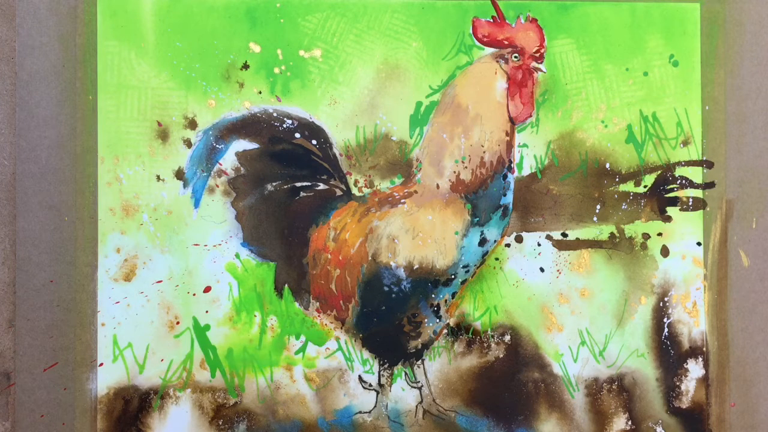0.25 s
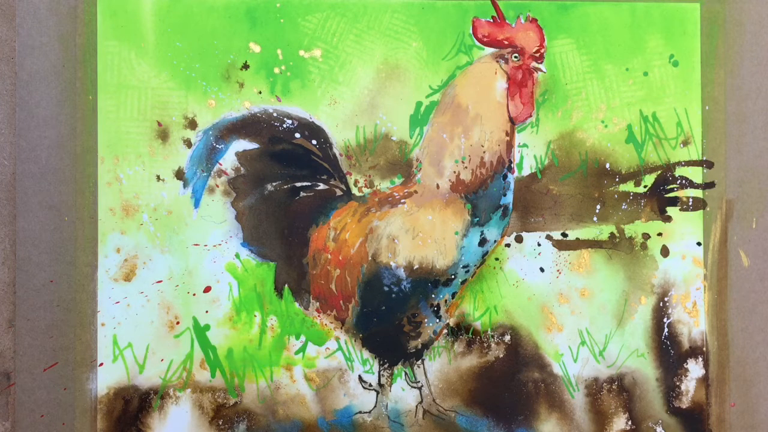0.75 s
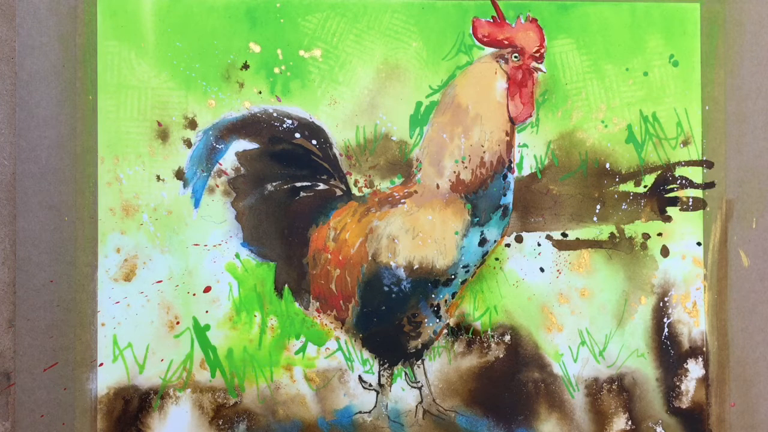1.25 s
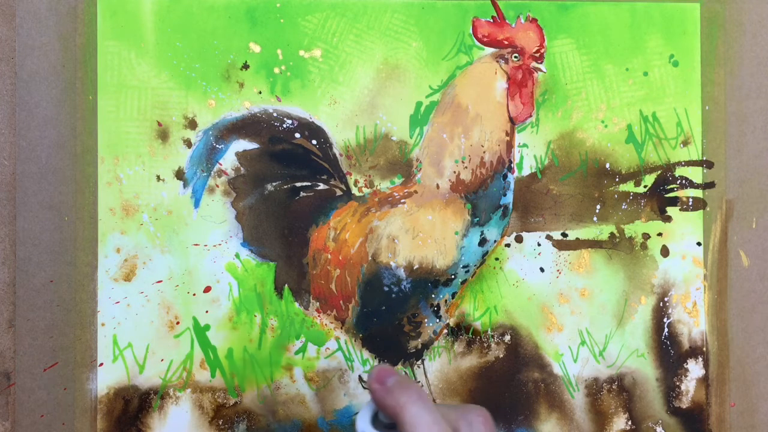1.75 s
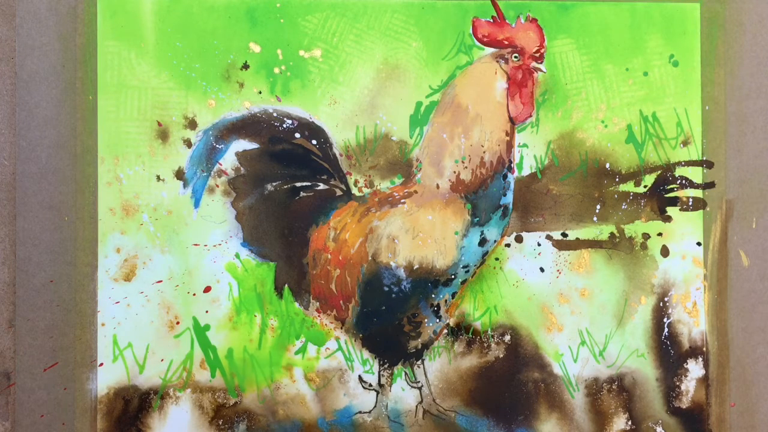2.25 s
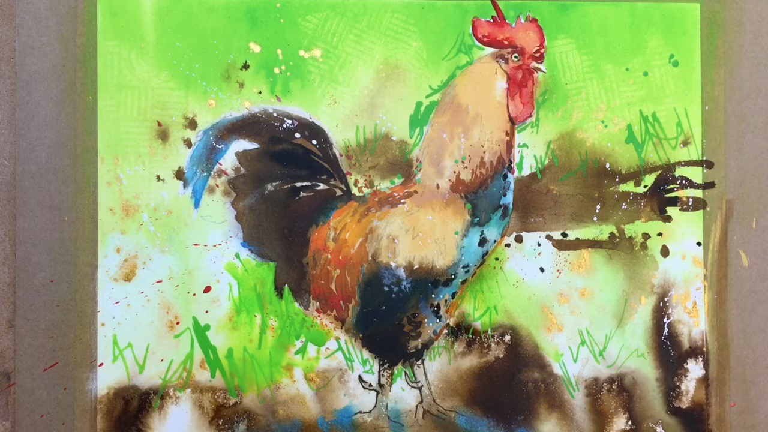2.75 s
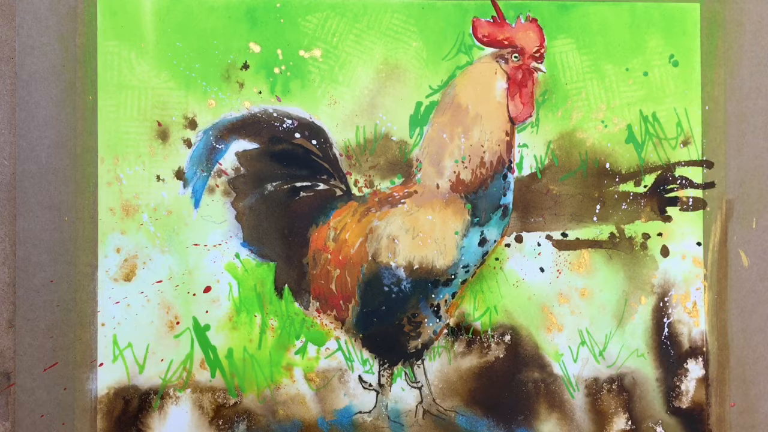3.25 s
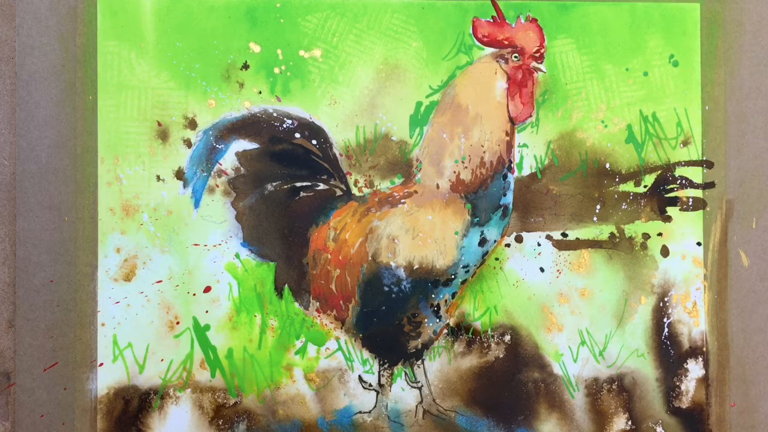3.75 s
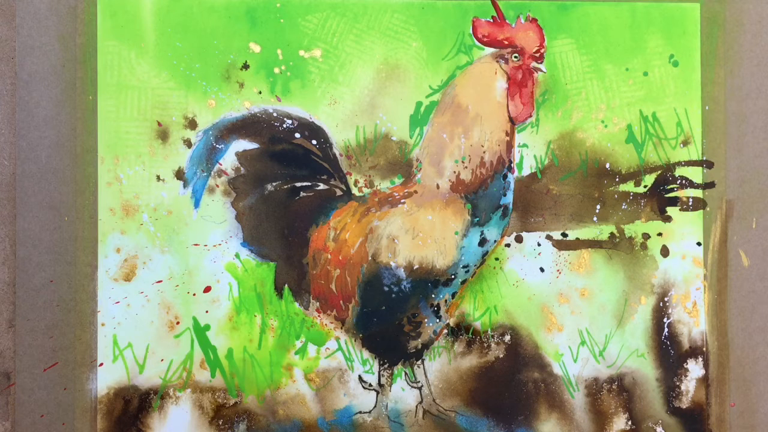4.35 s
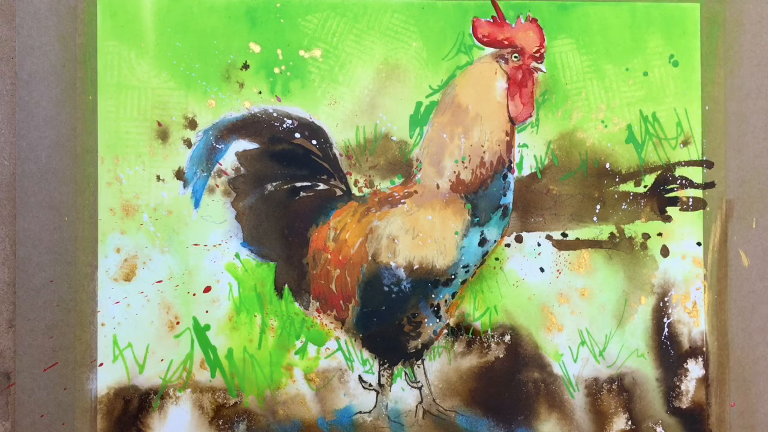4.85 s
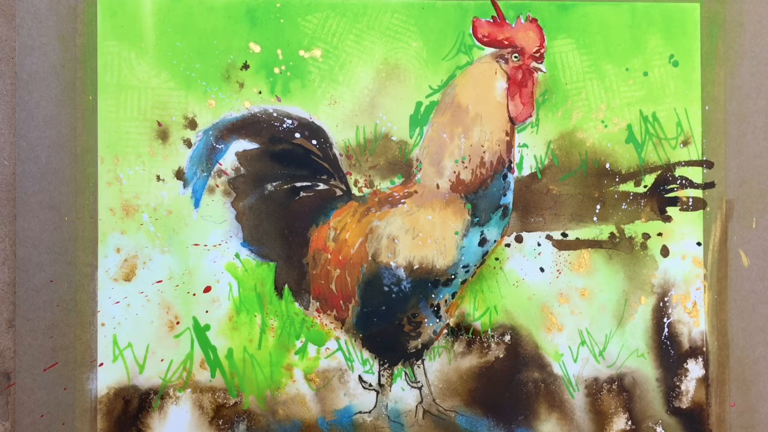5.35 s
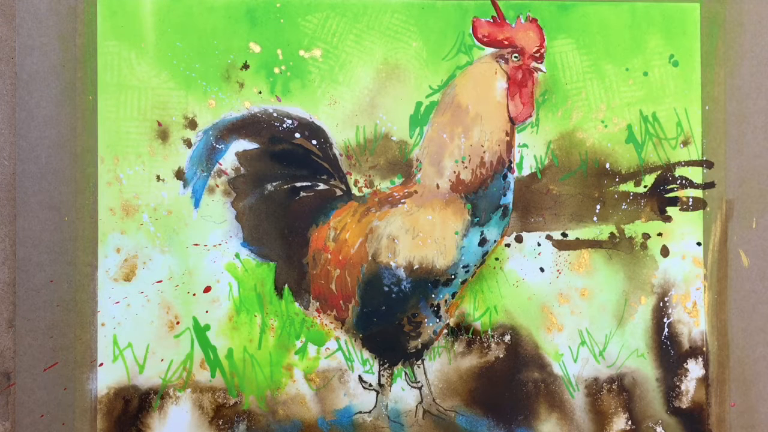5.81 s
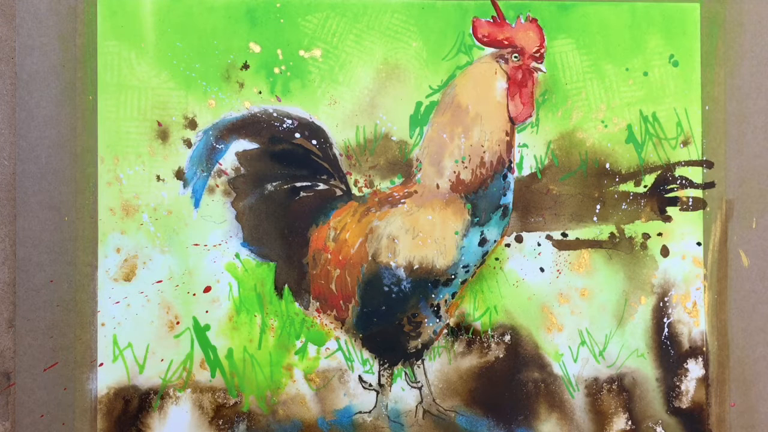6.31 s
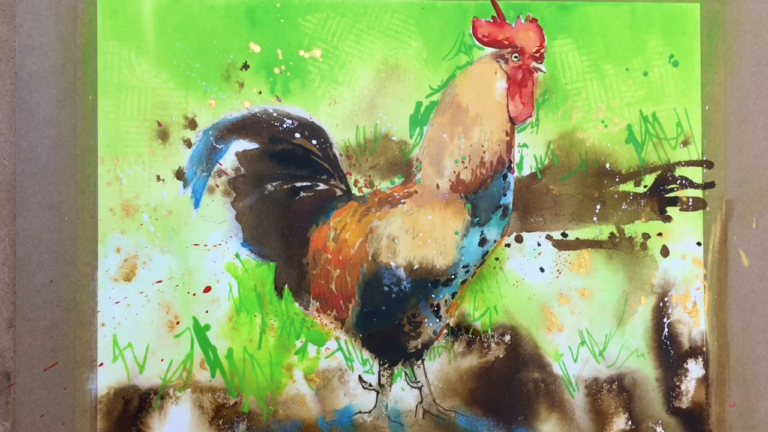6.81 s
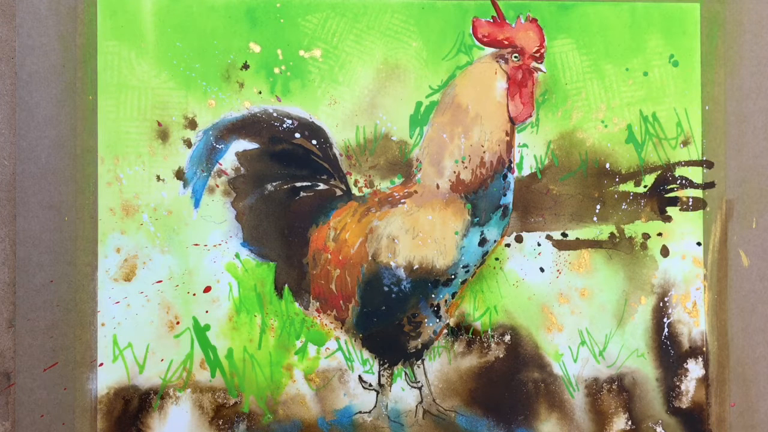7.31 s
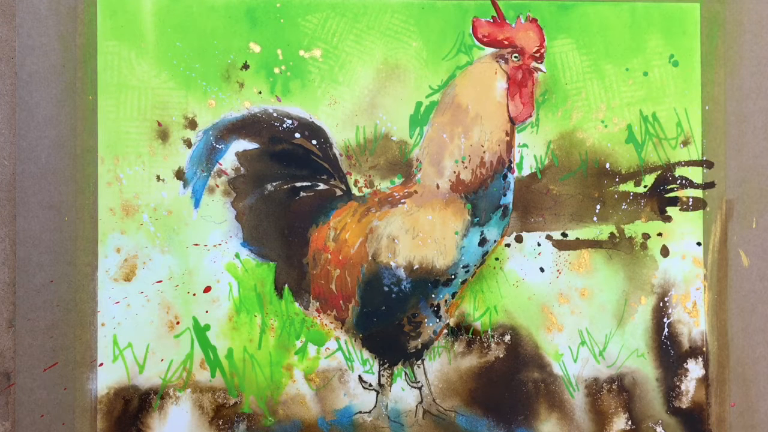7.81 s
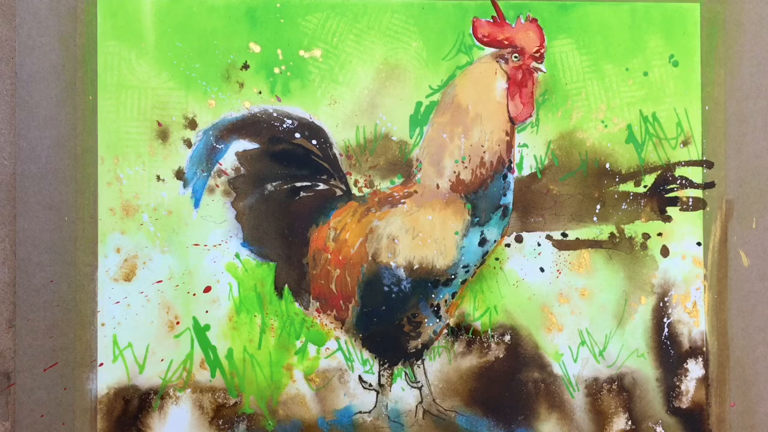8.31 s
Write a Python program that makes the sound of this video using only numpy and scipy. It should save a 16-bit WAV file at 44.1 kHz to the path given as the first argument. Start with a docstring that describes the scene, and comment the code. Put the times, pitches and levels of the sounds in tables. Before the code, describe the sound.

A pump bottle gives three short misty squirts and a slower airy one, then after quiet it clatters down and the table is bumped.

```python
"""A pump bottle mists a wet painting with three short squirts, then a slow, airy one, in a quiet room.
Jets are coloured noise broken into droplets; soft brushing is brief swells of broad noise.
After one last weak puff the plastic bottle is put down among the painting things with a clatter:
short buzzes of contact set its modes ringing. Then the table is bumped and a paint tray judders as it
is pushed along, both as struck modes with dying noise. A low rumble and a faint hiss lie underneath."""
import sys
import numpy as np
from scipy import signal
from scipy.fft import rfft, irfft, next_fast_len
from scipy.io import wavfile

SR = 44100
rng = np.random.default_rng(int(sys.argv[2]) if len(sys.argv) > 2 else 0)


def generate_wav(signal):
    """Clip the signal to [-1, 1] and save it as 16-bit WAV at the path in sys.argv[1]."""
    frames = np.transpose(np.atleast_2d(signal))
    scaled = np.clip(frames, -1, 1) * 32767
    pcm = np.round(scaled).astype(np.int16)
    wavfile.write(sys.argv[1], SR, pcm)


N = 377937
TIME = np.arange(N) / SR  # [s]


def from_db(db):
    """Level to gain: 20 dB is a factor of ten in amplitude."""
    return 10 ** (np.asarray(db) / 20)


def rms_one(x):
    """Normalise the mean power: scale to rms 1."""
    return x / np.sqrt(np.mean(x ** 2) + 1e-20)


def at_hz(points, hz):
    """Pitch is heard in ratios: read a table along a log-frequency axis."""
    f, value = np.transpose(points)
    return np.interp(np.log(np.maximum(hz, 1)), np.log(f), value)


def coloured(spectrum, size):
    """Spectral shaping: white noise weighted by a colour; its level follows the colour's densities."""
    hz = np.arange(size // 2 + 1) * SR / size
    white = rfft(rng.standard_normal(size))
    return irfft(white * from_db(at_hz(spectrum, hz)), size)


def noise(spectrum):
    """Stationary turbulence: steady noise of a given colour, rms 1."""
    return rms_one(coloured(spectrum, next_fast_len(N))[:N])


def flutter(per_s):
    """Random modulation: lines between random knots, per_s of them a second, with a spread of 1."""
    knots = rng.standard_normal(N)
    return rms_one(np.interp(TIME * per_s, np.arange(N), knots))


def high_pass(x, hz):
    """Fourth-order filtering: the bass falls by 24 dB per octave below the corner."""
    return signal.sosfilt(signal.butter(4, hz, "high", fs=SR, output="sos"), x)


def add(out, s, sound):
    """Superposition: mix a sound in from time s."""
    at = int(round(s * SR))
    out[at:at + len(sound)] += sound[:N - at]


def ring(modes, uneven_db):
    """Modal decay: a blow excites every mode with a strength of its own, and each dies exponentially."""
    t = TIME[:SR // 2]
    chance = rng.standard_normal(len(modes))
    out = np.zeros(len(t))
    for k, (hz, db, t60) in enumerate(modes):
        gain = (-1) ** k * from_db(db + uneven_db * chance[k])
        out += gain * np.exp(-np.log(1000) * t / t60) * np.sin(2 * np.pi * hz * t)
    return out


def dying_noise(spectrum, t60s):
    """High modal density: countless modes merge into noise that starts at rms 1 and dies band by band."""
    size = SR // 2
    hz = np.arange(size // 2 + 1) * SR / size
    start = rfft(rms_one(coloured(spectrum, size)))
    edges = [0, 300, 600, 1200, 2400, 4800, 9600, SR / 2]  # [Hz]
    out = np.zeros(size)
    for low, high in zip(edges, edges[1:]):
        t60 = at_hz(t60s, (low + high) / 2)
        band = irfft(start * (hz >= low) * (hz < high), size)
        out += band * np.exp(-np.log(1000) * TIME[:size] / t60)
    return out


def stroke(start, attack, length, fall_db_per_s):
    """Pressure envelope of one push: it rises, holds to the end of its length and dies exponentially."""
    t = TIME - start
    fall_db = np.minimum(fall_db_per_s * np.maximum(t - length, 0), 100)
    return np.clip(t / attack, 0, 1) ** 2 * from_db(-fall_db)


def spray(grain_db, sputter_s, spurt_db):
    """Jet break-up: rushing air tears into hissing droplets that land; air in the nozzle makes it spit."""
    # strokes of the pump: (start [s], attack [s], length [s], rush of air [dB], hiss of mist [dB],
    # mist landing on the paper [dB], lingering wisp [dB])
    squirts = [(.037, 0.018, 0.11, -48, -48.5, -74, -72), (1.017, .014, 0.082, -50, -48.5, -78, -56),
               (1.858, .012, 0.11, -52.5, -40.5, -56.5, -56.5), (7.211, 0.074, .1, -63.5, -50, -88, -80)]
    # sputters of the nozzle: (time [s], level [dB])
    sputters = [(0.046, -52), (1.069, -43), (1.076, -43), (1.874, -41), (1.9072, -34.5)]
    # colours of the air, the mist, its landing on the paper and the narrow, wet hiss that outlasts
    # each squirt: (frequency [Hz], density [dB per Hz])
    air_colour = [(400, -69), (750, -24), (1000, -10), (1170, 1), (1350, -17), (1720, -2), (2100, -2),
                  (2750, 2.5), (3500, 2), (4100, -8.5), (6000, -6), (12000, -24)]
    mist_colour = [(1500, -22), (4000, -6), (5000, -2), (5900, 1), (7200, .5), (7800, -3.5), (8400, -1),
                   (9500, -1), (10300, -7), (11300, -2.5), (12300, -2.5), (12900, 1.5), (14100, 2.5),
                   (15600, -1)]
    paper_colour = [(400, -25), (620, -14), (780, -5.5), (950, -6), (1180, 3.5), (1400, -8.5), (2000, -26),
                    (4000, -33)]
    wisp_colour = [(1500, -31), (2150, -4), (2700, 2), (3400, -9), (4500, -24)]
    swell_range_db = 2  # pressure swells towards mid-stroke
    # after the stroke each part dies at its own rate [dB/s]
    air_fall, mist_fall, landing_fall, wisp_fall = 409, 514, 900, 202
    flight_s = 0.03  # the mist starts to reach the paper this much later
    drop_db = -10.5  # patter of the bigger drops, relative to the rush of air

    air, mist, landing, wisp = np.zeros((4, N))
    for s, attack, length, air_db, mist_db, paper_db, wisp_db in squirts:
        progress = np.clip((TIME - s) / length, 0, 1)
        swell_db = swell_range_db * (np.sin(np.pi * progress) - .5)
        air += from_db(air_db + swell_db) * stroke(s, attack, length, air_fall)
        mist += from_db(mist_db + swell_db) * stroke(s, attack, length, mist_fall)
        arrival = stroke(s + flight_s, attack, length - flight_s, landing_fall)
        landing += from_db(paper_db + swell_db) * arrival
        # the wisp builds up over the whole stroke
        wisp += from_db(wisp_db) * stroke(s, length, length, wisp_fall)
    for s, db in sputters:
        mist += from_db(db) * np.exp(-np.minimum(((TIME - s) / sputter_s) ** 2, 20))
    # fine grain and slower spurts
    droplets = from_db(grain_db * (flutter(2500) - 1.24) + spurt_db * flutter(260))
    jet = air * noise(air_colour) + mist * noise(mist_colour)
    jet += landing * noise(paper_colour) + wisp * noise(wisp_colour)
    return droplets * jet + from_db(drop_db) * air * patter()


def patter(count=16):
    """Random impacts: drops of random size each excite a short tick at one of a set of pitches; rms 1."""
    drops_per_s, spread_db = 800, 3
    low_hz, high_hz, t60_cycles = 1670, 7000, 22

    sizes = from_db(spread_db * np.minimum(rng.exponential(1, N), np.pi)) * rng.choice([-1, 1], N)
    drops = sizes * (rng.random(N) < drops_per_s / SR)
    dealt = rng.integers(0, count, N)
    out = np.zeros(N)
    for k, hz in enumerate(np.geomspace(low_hz, high_hz, count)):
        # two-pole resonator: radius sets the decay, angle the pitch
        radius = np.exp(-np.log(1000) * hz / (t60_cycles * SR))
        angle = 2 * np.pi * hz / SR
        poles = [1, -2 * radius * np.cos(angle), radius * radius]
        out += signal.lfilter([0, np.sin(angle)], poles, drops * (dealt == k) + 1e-18)
    return rms_one(out)


def slow_press(gain_db, grain_db, split_hz, flutter_db):
    """Turbulent flow: a longer, duller rush, brighter as it strengthens, led in by a hollow, wavering hiss."""
    # flow, mostly air and little mist: (time [s], level before gain_db [dB])
    flow = [(3.12, -73), (3.186, -63.5), (3.192, -54), (3.268, -57.5), (3.322, -43), (3.38, -43),
            (3.41, -49.5), (3.436, -47), (3.52, -81)]
    # colours of the airy jet and of the hollow hiss: (frequency [Hz], density [dB per Hz])
    swish_colour = [(300, -21), (600, -19), (880, -13), (1100, -14), (1700, -5), (2100, 1), (3100, -0.5),
                    (3900, -2), (5000, -9.5), (5800, -9.5), (7300, -15.5), (9300, -19), (10400, -23),
                    (15500, -28)]
    leak_colour = [(400, -13), (700, -4.5), (850, 3.5), (1080, -11), (1450, -9), (1580, -23), (1730, 7.5),
                   (1950, -30), (2800, -20), (3150, -2), (3500, -23), (3850, -19), (4500, -34), (7000, -35)]
    full_flow_db, bright_db_per_db = -46, 0.16  # the stronger the flow, the brighter the rush
    leak_db = -55.5

    level_db = np.interp(TIME, *np.transpose(flow), left=-140, right=-140)
    rush = noise(swish_colour) * from_db(grain_db * flutter(600))
    low = signal.sosfilt(signal.butter(2, split_hz, fs=SR, output="sos"), rush)
    high = signal.sosfilt(signal.butter(2, split_hz, "high", fs=SR, output="sos"), rush)
    tilt = from_db(np.clip(bright_db_per_db * (level_db - full_flow_db), -10, 10))
    # the bands are opposite in phase at the split, so subtracting joins them
    press = from_db(level_db + gain_db) * (low / tilt - high * tilt)
    leak = stroke(3.178, attack=0.01, length=0.07, fall_db_per_s=200) * noise(leak_colour)
    return press + from_db(leak_db + flutter_db * flutter(150)) * leak


def taps(skirt_db, low_hz, bottle_low_hz, rise_share, sizzle_db, sizzle_s):
    """Impact excitation: each contact buzzes around its own pitch; the hollow bottle rings and sizzles."""
    # small things knocking: (time [s], click level [dB], click pitch [Hz], click width [octaves],
    # bottle ring level [dB])
    contacts = [(7.378, -53, 934, 0.11, -82), (7.4238, -36.5, 11800, 0.31, -52),
                (7.435, -34.5, 6200, 0.1, -51), (7.4492, -33.5, 3920, 0.37, -54),
                (7.451, -29, 2124, 0.087, -33), (7.502, -46, 4160, 0.13, -58), (7.504, -53, 1620, .27, -75),
                (7.52, -58, 2200, .24, -61), (7.631, -53, 14000, .2, -72), (7.632, -48, 2180, .17, -66),
                (7.651, -42.5, 5350, 0.16, -48), (7.678, -47.5, 2240, .22, -58),
                (7.753, -43.5, 2430, 0.1, -72), (7.799, -56.5, 2830, 0.45, -75),
                (7.831, -53, 5140, 0.27, -80), (7.925, -44.5, 2610, 0.12, -57),
                (8.066, -56, 1310, 0.31, -85), (8.073, -57.5, 630, 0.062, -83),
                (8.082, -57, 1200, 0.28, -81), (8.289, -41, 1900, 0.092, -57),
                (8.289, -38.5, 920, .14, -56), (8.399, -55.5, 7900, 0.16, -80)]
    # modes of the bottle: (frequency [Hz], level [dB], t60 [s])
    bottle_modes = [(1184, 0, .065), (2099, -11, .11), (2190, -7, .05), (2385, -16, .08), (3047, -13, .045),
                    (3700, -15, .02), (4100, -14, .03), (5905, -15, .022), (6465, -15, .022)]
    # brief bright sizzle of a blow on the bottle: (frequency [Hz], density [dB per Hz])
    sizzle_colour = [(1000, -11), (3000, -6), (6000, 4), (9000, -12), (14000, -4)]
    click_cycles = 10.8  # fade in cycles of the click's own pitch: high ones are shorter
    hard_db, shorter_db_per_db = -41, 0.1  # blows harder than this let go sooner

    clicks, bottle, sizzle = np.zeros((3, N))
    size = SR // 2
    t = TIME[:size]
    freq = np.maximum(np.arange(size // 2 + 1) * SR / size, 1)
    for s, db, hz, width, bottle_db in contacts:
        octaves = np.log2(freq / hz)
        fade_s = click_cycles / hz * from_db(-shorter_db_per_db * max(db - hard_db, 0))
        # a narrow peak on a broad skirt
        colour = 1 / (1 + (octaves / width) ** 4)
        colour += from_db(skirt_db) / (1 + (octaves / 2) ** 2) ** np.pi
        fade = np.exp(-t / fade_s)
        # longer contacts also start more softly
        rise = 1 - np.exp(-t / (rise_share * fade_s))
        click = irfft(rfft(rng.standard_normal(size)) * colour, size) * rise * fade
        # the level sets the energy of the click
        click *= np.sqrt(np.sum(fade ** 2) / np.sum(click ** 2))
        add(clicks, s, from_db(db) * click)
        add(bottle, s, from_db(bottle_db) * ring(bottle_modes, 1))
        add(sizzle, s, from_db(bottle_db + sizzle_db) * np.exp(-t / sizzle_s))
    # small things radiate no bass
    return high_pass(clicks, low_hz) + high_pass(bottle, bottle_low_hz) + sizzle * noise(sizzle_colour)


def knocks(blows, modes, clatter_db, crack_db, crack_s):
    """Modal impact: heavy blows give a short crack, the low modes of the body and a dying clatter."""
    # colour of the dense, short-lived clatter: (frequency [Hz], density [dB per Hz])
    clatter_colour = [(60, -5), (110, 2), (200, 3), (500, -3), (1100, 0.5), (2000, -7), (3000, -12),
                      (5500, -19), (7000, -25.5), (10000, -45), (16000, -39)]
    # its decay: (frequency [Hz], t60 [s])
    clatter_t60 = [(200, 0.59), (1000, 0.28), (2500, 0.17), (6000, 0.12), (16000, 0.2)]

    out = np.zeros(N)
    for s, db in blows:
        crack = dying_noise(clatter_colour, clatter_t60) * np.exp(-TIME[:SR // 2] / crack_s)
        clatter = dying_noise(clatter_colour, clatter_t60)
        blow = ring(modes, 0.54) + from_db(clatter_db) * clatter + from_db(crack_db) * crack
        add(out, s, from_db(db) * blow)
    return out


def table_bumps():
    """Impulsive excitation of a plate: blows on the table ring its low modes."""
    # blows on the table: (time [s], level [dB])
    bumps = [(8.2915, -51.5), (8.3285, -27.5), (8.3805, -38), (8.411, -46.5)]
    # modes of the table: (frequency [Hz], level [dB], t60 [s])
    table_modes = [(75.5, -17.5, 0.37), (187, 2.5, 0.1), (218, -0.5, 0.32), (246, -3.5, 0.23),
                   (290.4, -3.5, 0.22), (364.6, 1, 0.18), (488, 1, 0.046), (557, -2, 0.1), (635, -15, 0.18),
                   (777, -7.5, 0.19), (844, -19, 0.22), (1194, -18, 0.21), (1700, -19.5, 0.28)]
    return knocks(bumps, table_modes, clatter_db=-5.5, crack_db=-9.5, crack_s=0.0088)


def tray_slips():
    """Stick-slip: the pushed tray lets go in jerks, each striking its modes."""
    # slips of the tray: (time [s], level [dB])
    slips = [(8.498, -27), (8.5195, -32.5), (8.5335, -31.5), (8.563, -34.5)]
    # modes of the tray: (frequency [Hz], level [dB], t60 [s])
    tray_modes = [(92.7, -5, 0.08), (206, 1.5, 0.17), (278.5, -5, 0.21), (493, -8.5, 0.071),
                  (567, -16, 0.33), (996, -6.5, 0.12), (1105, -10.5, 0.071), (1310, -12, 0.062),
                  (1670, -24, 0.055), (2080, -5.5, 0.034)]
    return knocks(slips, tray_modes, clatter_db=-6, crack_db=-9.0, crack_s=0.0095)


def rustles():
    """Friction noise: soft brushing of hands and things, quick to swell and slower to fade."""
    # brushings: (time [s], level [dB], fade [s], centre [Hz])
    brushings = [(2.66, -68.5, 0.06, 1950), (2.78, -69.5, 0.027, 900), (2.846, -69.5, 0.018, 1290),
                 (5.95, -73, 0.034, 2200), (6.209, -63.5, 0.025, 1290), (7.387, -62, 0.031, 2000),
                 (7.652, -53.5, 0.019, 2600), (7.929, -54.5, .019, 3170)]
    rise_share = 0.43  # rise as a share of the fade

    out = np.zeros(N)
    for s, db, fade_s, hz in brushings:
        colour = [(hz / 8, -22), (hz / 2, -3), (hz, 0), (hz * 3, -10), (hz * 8, -20)]
        width = fade_s * np.where(TIME < s, rise_share, 1)
        swell = np.exp(-.5 * np.minimum(((TIME - s) / width) ** 2, 100))
        out += from_db(db) * swell * noise(colour)
    return out * from_db(2 * flutter(200))


def room(x, wet_db, delay_s):
    """Reverberation: diffuse reflections of a small room die at a rate set by frequency."""
    colour = [(100, 3.0), (2500, 1), (8000, 0.0), (16000, -4.0)]  # (frequency [Hz], density [dB per Hz])
    t60s = [(300, 0.11), (2500, 0.2), (8000, 0.17), (16000, 0.2)]  # (frequency [Hz], t60 [s])
    tail = dying_noise(colour, t60s)
    echoes = np.zeros(N)
    add(echoes, delay_s, tail / np.sqrt(np.sum(tail ** 2)))
    return x + from_db(wet_db) * signal.fftconvolve(x, echoes[:SR])[:N]


def low_rumble():
    """Band-limited noise: the room's low rumble wavers and rises and falls in level."""
    # level of the rumble, before its wavering: (time [s], level [dB])
    rumble_levels = [(0.0, -64), (0.57, -69), (1.12, -62), (1.8, -69.5), (1.92, -54), (1.94, -66),
                     (2.65, -68.5), (2.69, -57.5), (2.9, -64.5), (3.31, -57.5), (4.32, -63), (4.45, -70.5),
                     (4.8, -63.5), (4.84, -53.5), (5.14, -69), (5.23, -55.5), (5.6, -63.5), (8.2, -68)]
    # colour of the rumble: (frequency [Hz], density [dB per Hz])
    rumble_colour = [(20, -33), (32, -24), (45, -9.5), (68, 4.5), (90, 0), (125, -12), (200, -33.5),
                     (400, -67)]
    waver_db = 1.6
    level_db = np.interp(TIME, *np.transpose(rumble_levels)) + waver_db * flutter(12)
    return from_db(level_db) * noise(rumble_colour)


def room_hiss():
    """Stationary noise: the faint steady hiss of the room."""
    # colour of the hiss: (frequency [Hz], density [dB per Hz])
    hiss_colour = [(76, -48), (130, -0.5), (172, -3), (252, -4), (350, -9.5), (570, -12.5), (800, -14.5),
                   (2200, -15), (4900, -21.5), (6200, -22), (9500, -25.5), (10400, -29), (11500, -26),
                   (15500, -30)]
    return from_db(-69.5) * noise(hiss_colour)


def scene():
    """Superposition: spray and handling over the room's rumble and a faint hiss."""
    jets = spray(grain_db=2.0, sputter_s=0.0022, spurt_db=2.0)
    jets += slow_press(gain_db=-2, grain_db=1.5, split_hz=1160, flutter_db=1.5)
    airy = room(jets + rustles(), wet_db=-12, delay_s=.005)
    contacts = taps(skirt_db=-22.5, low_hz=510, bottle_low_hz=1030,
                    rise_share=0.07, sizzle_db=-7.5, sizzle_s=0.011)
    clatter = room(contacts, wet_db=-8.5, delay_s=.004)
    heavy = high_pass(table_bumps() + tray_slips(), hz=58)
    return (airy + clatter + heavy + room_hiss() + low_rumble())[None]


def record(dry):
    """Band limiting: an elliptic low-pass cuts the top steeply above 15.7 kHz."""
    return signal.sosfilt(signal.ellip(12, .1, 80, 15700, fs=SR, output="sos"), dry)


dry = scene()
out = record(dry)
generate_wav(out)
```